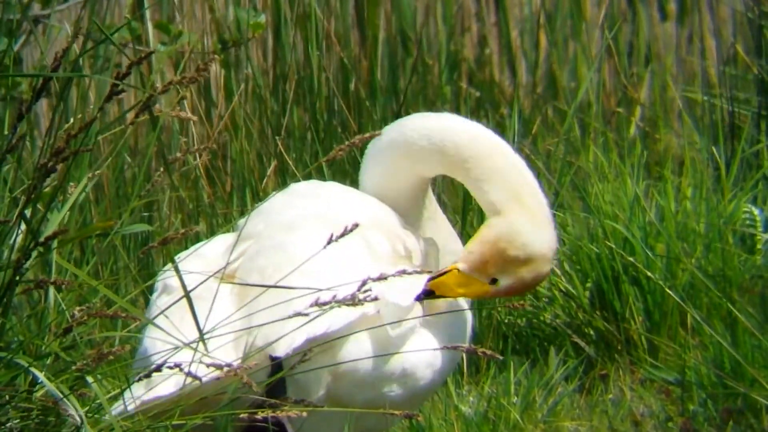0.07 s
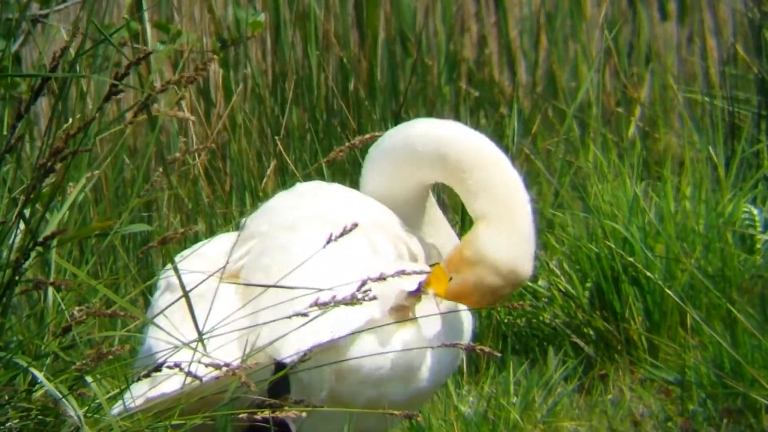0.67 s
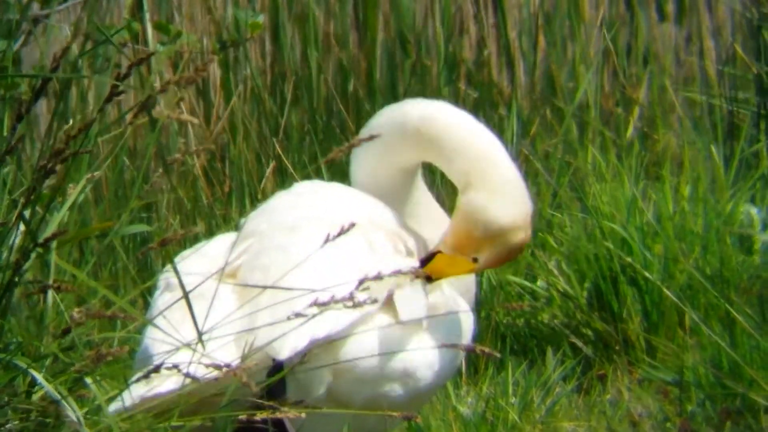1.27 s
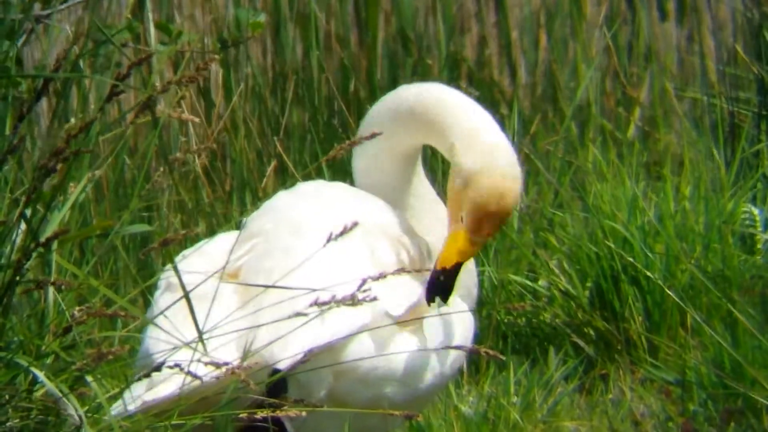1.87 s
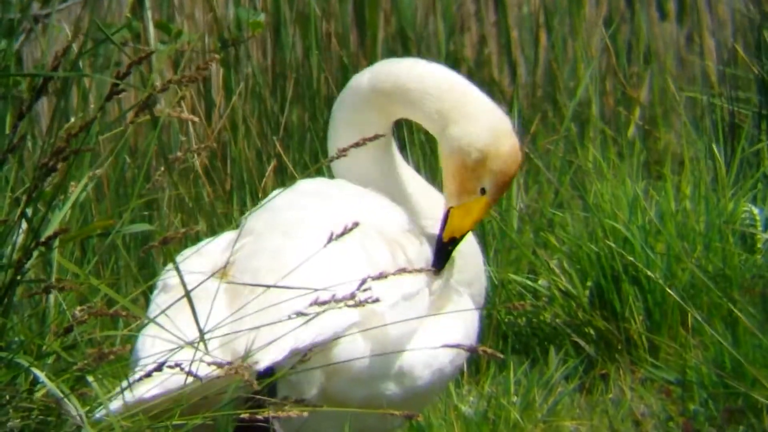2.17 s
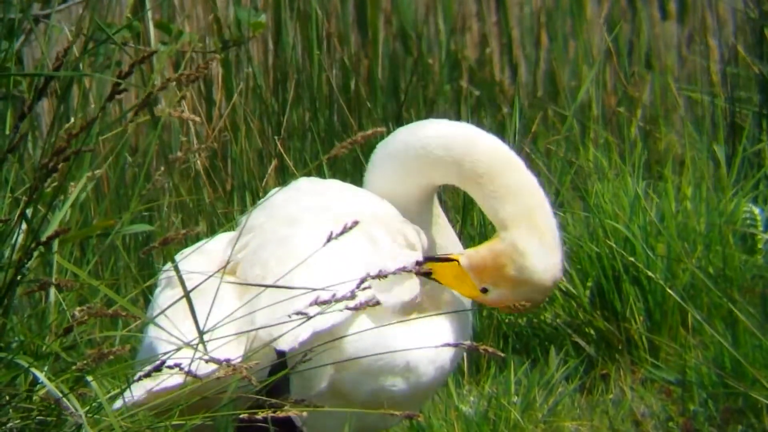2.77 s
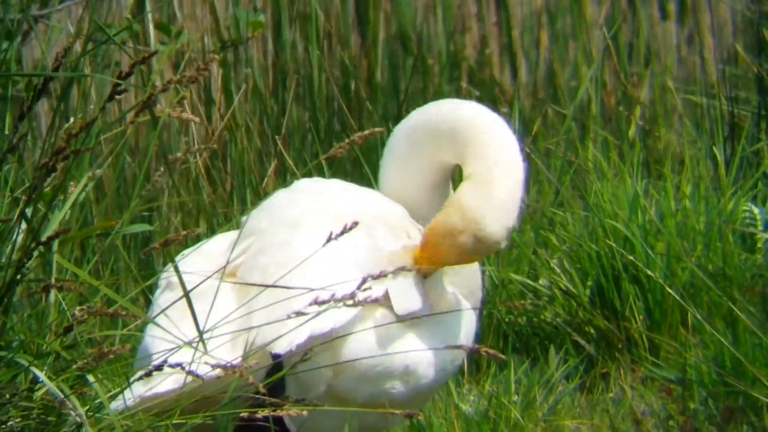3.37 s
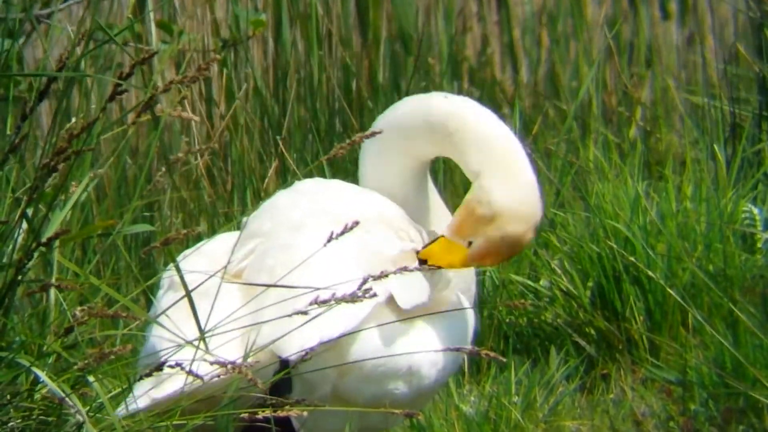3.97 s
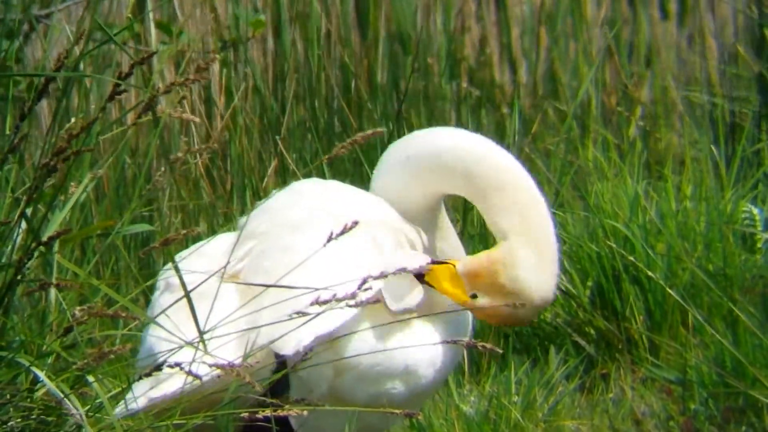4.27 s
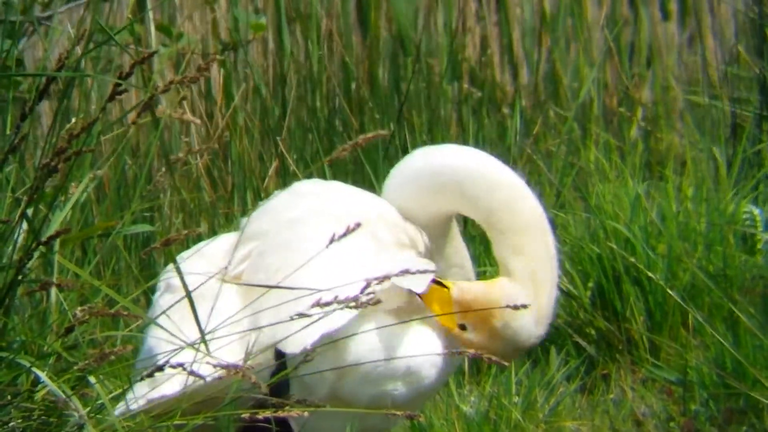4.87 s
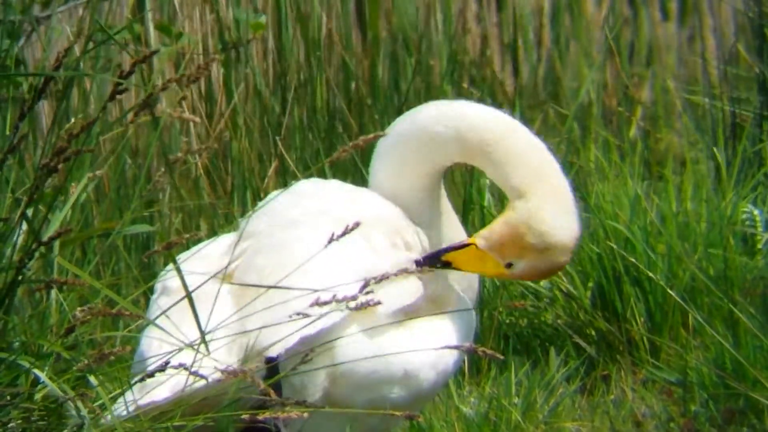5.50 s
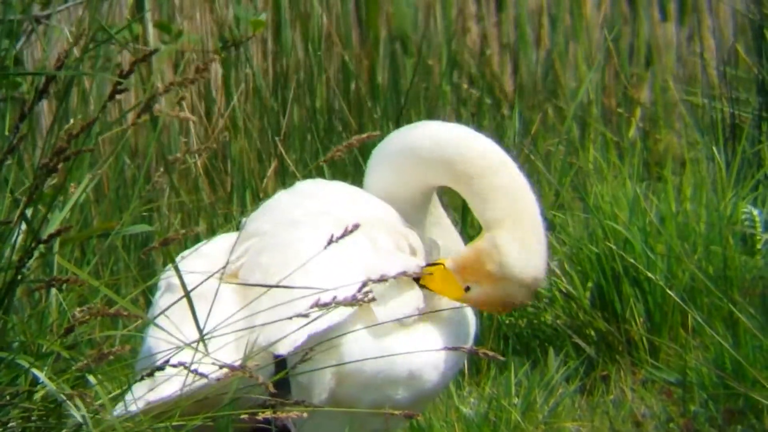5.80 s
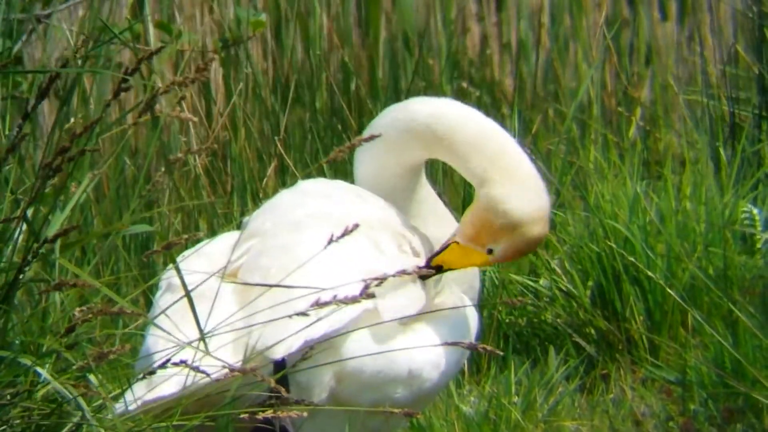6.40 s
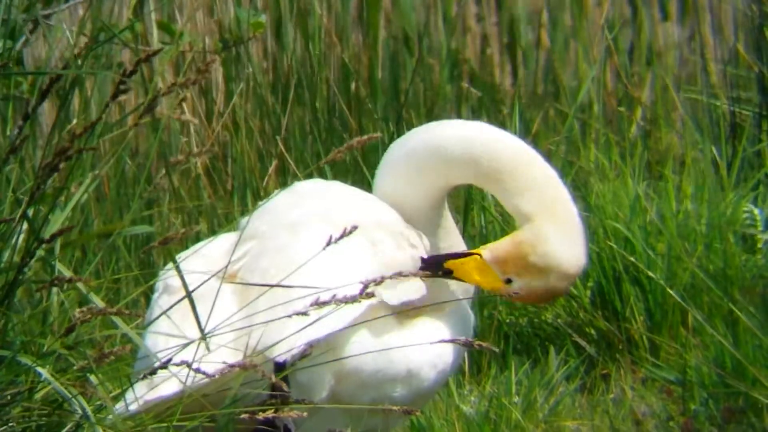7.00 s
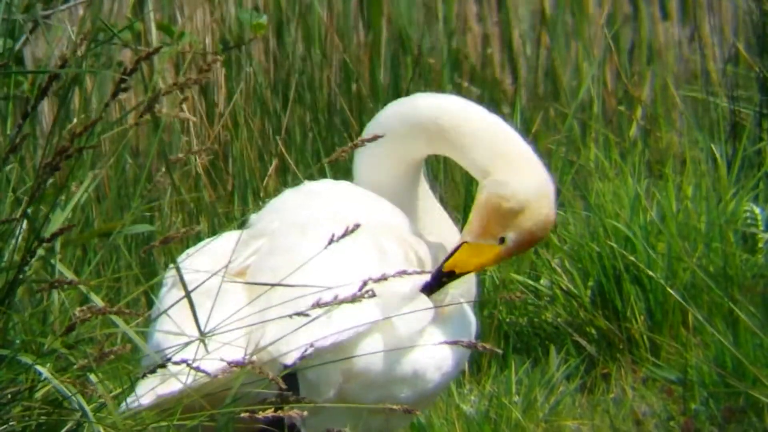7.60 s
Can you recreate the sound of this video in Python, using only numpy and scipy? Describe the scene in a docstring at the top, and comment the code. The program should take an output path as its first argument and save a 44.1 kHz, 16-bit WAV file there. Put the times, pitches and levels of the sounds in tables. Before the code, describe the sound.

Wind rustles and knocks dry reeds and bumps the microphone, with a swan's light preening clicks and small birds singing far off.

```python
"""Reeds hiss in a gusty breeze at the edge of a reed bed, with small birds whistling far off.
The gusts brush leaves together and knock stalks, and eddies buffet each microphone port in turn.
Near the microphone a swan preens: bill and quills click, and feathers swish through the bill.
Dry blades rub and snap, a distant waterfowl calls twice, and toward the end a warbler chatters
over the twitter of farther birds."""
import sys
import numpy as np
from scipy import signal
from scipy.fft import rfft, irfft
from scipy.io import wavfile
from scipy.ndimage import uniform_filter1d

SR = 44100
rng = np.random.default_rng(int(sys.argv[2]) if len(sys.argv) > 2 else 0)


def master_out(mix):
    """Clip the mix to full scale and print it as 16-bit PCM to the path in sys.argv[1]."""
    frames = np.transpose(np.atleast_2d(mix))
    ceiling = np.clip(frames, -1, 1)
    pcm = np.round(ceiling * 32767).astype(np.int16)
    wavfile.write(sys.argv[1], SR, pcm)


N = 337365


def amp(db):
    """Decibels to gain."""
    return 10 ** (np.asarray(db) / 20)


def unit(x):
    """Scales to an rms of 1."""
    return x / np.sqrt(np.mean(x ** 2) + 1e-20)


def drift(count, span):
    """A random wander of rms 1, smoothed over span steps."""
    return unit(uniform_filter1d(rng.standard_normal(count), size=span))


def read(spectrum, hz):
    """Reads a spectrum on a log-frequency axis."""
    freq_hz, value = np.transpose(spectrum)
    return np.interp(np.log(hz + 1), np.log(freq_hz + 1), value)


def follow(rows, lag_s=0):
    """Each column of a time curve at every sample, lag_s late."""
    times, *columns = np.transpose(rows)
    return [np.interp(np.arange(N) / SR - lag_s, times, column) for column in columns]


def add(mix, start_s, sound):
    """Mixes a sound in at start_s."""
    part = mix[..., max(round(start_s * SR), 0):][..., :sound.shape[-1]]
    part += sound[..., :part.shape[-1]]


def sides(pan_db):
    """Gains of the two microphone ports; pan_db is left minus right."""
    return amp(np.array([[.5], [-.5]]) * pan_db)


def colour(x, spectrum, stretch=1):
    """Filters by a spectrum whose frequencies are multiplied by stretch."""
    hz = np.fft.rfftfreq(x.shape[-1], 1 / SR)
    return irfft(rfft(x) * amp(read(spectrum, hz / stretch)), x.shape[-1])


def crackle(spectrum, per_s, spread_db):
    """Tiny contacts of unequal size, each stronger in one port."""
    size = amp(spread_db * np.minimum(rng.exponential(1, N), 3))
    contacts = rng.random(N) < per_s / SR
    return unit(colour(size * contacts * rng.uniform(-0.99, 1, (2, N)), spectrum))


# How alike the two ports hear the surrounding noise: freq_hz, coherence
PORT_COHERENCE = [(40, 0.46), (150, 0.86), (300, 0.95), (700, 0.62), (1300, 0.72), (2200, 0.1), (6000, 0),
                  (15000, 0.07)]
def wash(spectrum, patchy_db, flutter_db, lag_ms):
    """Noise with drifting patches and a shared flutter, reaching the right port a little late."""
    frames, hz = N // 256 + 5, np.fft.rfftfreq(1024, 1 / SR)
    a, b, c, d, patches = np.moveaxis(rng.standard_normal((frames, len(hz), 5)), -1, 0)
    patches = unit(uniform_filter1d(uniform_filter1d(patches, size=10, axis=0), size=20, axis=1))
    flutter = drift(frames, 7)[:, None]
    coherence = np.clip(read(PORT_COHERENCE, hz), 0, 1)
    left, unrelated = a + 1j * b, c + 1j * d
    right = coherence * left + np.sqrt(1 - coherence ** 2) * unrelated
    right *= np.exp(-2j * np.pi * hz * lag_ms / 1000)
    bins = np.array([left, right]) * amp(read(spectrum, hz) + patchy_db * patches + flutter_db * flutter)
    _, noise = signal.istft(bins.swapaxes(1, 2), nperseg=1024, noverlap=768)
    return unit(noise[:, :N])


# Gusts in the reed bed, heard as leaf hiss: time_s, level_db, pan_db
GUST_CURVE = [(.06, -55, -1), (.165, -60.5, -2), (.23, -55.5, 1), (.285, -50, 0), (.345, -46, 0),
              (.42, -48, 1.5), (.5, -46.5, 1.5), (.63, -51.5, 3), (.9, -52.5, .5), (.97, -57, 2),
              (1.06, -56, 2), (1.11, -58, 1), (1.22, -52, -0.5), (1.295, -49, -3.5), (1.38, -51.5, -1.5),
              (1.46, -53.5, 0), (1.6, -51.5, 1.5), (2.12, -51.5, 0.5), (2.39, -46.5, -2), (2.46, -50, 1.5),
              (2.85, -52, 1.5), (3.1, -59, 2.5), (3.551, -60, 2.5), (3.8, -55.5, 3.5), (4.28, -58, 2.5),
              (4.46, -63.5, 2.5), (6.88, -65, 1), (7.1, -62, -1.5), (7.53, -59, -1.5), (7.65, -63, 0)]
# Leaves brushing: freq_hz, gain_db
LEAF_SPECTRUM = [(710, -21), (1200, -7.5), (1600, -8.5), (1730, -6.5), (2480, -3), (2950, -2.5), (4530, -2),
                 (6110, 2), (7330, 1.5), (8790, -6.5), (10700, -11), (14700, -13), (15500, -17.5)]
def leaves():
    """Gusts brush the reed leaves together in a bright hiss full of small ticks."""
    gust_db, pan_db = follow(GUST_CURVE)
    hiss = amp(4.5) * wash(LEAF_SPECTRUM, patchy_db=1.5, flutter_db=.6, lag_ms=0.303)
    ticks = amp(-6.5) * crackle(LEAF_SPECTRUM, per_s=640, spread_db=0)
    return (hiss + ticks) * amp(gust_db) * sides(pan_db)


def driven(level_db, growth, lag_s=0, average_gust_db=-55):
    """A wind-driven level: level_db in an average gust, plus growth dB for each dB of gust."""
    gust_db, _ = follow(GUST_CURVE, lag_s)
    return level_db + growth * (gust_db - average_gust_db)


SWAY = dict(level_db=-61.5, growth=0.88, lag_s=0.042)
# Stalks rubbing: freq_hz, gain_db
STALK_SPECTRUM = [(40, -25), (120, 1), (200, 4), (400, 0.5), (650, 0), (1000, -2.5), (1500, -11.5),
                  (2600, -36), (5000, -61)]
def stalks():
    """Swaying stalks rub with a low rustle, just behind each gust."""
    rustle = amp(2) * wash(STALK_SPECTRUM, patchy_db=2.5, flutter_db=1.5, lag_ms=0.3)
    ticks = amp(-6) * crackle(STALK_SPECTRUM, per_s=200, spread_db=4.5)
    return (rustle + ticks) * amp(driven(**SWAY))


# Rasp of dry blades: freq_hz, gain_db
BLADE_SPECTRUM = [(300, -19), (700, -6.5), (1100, -4.5), (1700, -3.5), (2400, -15), (3500, -11),
                  (6000, -51)]
# Longer rubs among the reeds: start_s, length_s, level_db
BLADE_RUBS = [(1.123, 0.28, -59.5), (1.697, 0.5, -56), (2.476, 0.54, -65)]
def blades():
    """Dry blades scrape across each other with the gusts and in a few longer strokes."""
    power = amp(driven(level_db=-67, growth=1.3)) ** 2
    for start_s, length_s, level_db in BLADE_RUBS:
        add(power, start_s, amp(level_db) ** 2 * np.hanning(round(length_s * SR)))
    rasp = amp(1.5) * wash(BLADE_SPECTRUM, patchy_db=3.5, flutter_db=-2, lag_ms=0.35)
    ticks = amp(-5.5) * crackle(BLADE_SPECTRUM, per_s=130, spread_db=3)
    return (rasp + ticks) * np.sqrt(power)


# Background of the marsh: freq_hz, gain_db
HUSH_SPECTRUM = [(20, -10), (60, 8), (170, 3.5), (300, -12.5), (480, -3.5), (1000, -20), (1800, -15),
                 (2800, -9), (4800, -6.5), (5600, -41), (7300, -2.5), (10400, -25), (14500, -16.5),
                 (15500, -13.5)]
# Breeze at the microphone: freq_hz, gain_db
RUMBLE_SPECTRUM = [(15, -20), (35, -0.5), (70, 2), (150, 3.5), (220, -7), (350, -10), (800, -30),
                   (2000, -47)]
def open_air():
    """A steady hush, stronger on the right, and a low rumble that swells a little with the gusts."""
    hush = wash(HUSH_SPECTRUM, patchy_db=2.5, flutter_db=0.5, lag_ms=0.12)
    rumble = wash(RUMBLE_SPECTRUM, patchy_db=0.5, flutter_db=1.7, lag_ms=0.051)
    return amp(-67) * sides(-11) * hush + amp(driven(level_db=-61.5, growth=0.3)) * rumble


def from_afar(x, t60_s, wet_db):
    """Distance across the marsh: a direct path and a diffuse tail scattered by the vegetation."""
    t = np.arange(SR // 2) / SR
    tail = rng.standard_normal((2, len(t))) * amp(-60 * t / t60_s)
    tail /= np.linalg.norm(tail[0])
    scattered = signal.fftconvolve(x[None], tail, axes=1)[:, :N]
    return (x + amp(wet_db) * scattered) / np.hypot(1, amp(wet_db))


def note(hz, waver):
    """A softly started bird tone whose pitch and strength both waver."""
    wobble, shimmer = drift(len(hz), 200), drift(len(hz), 200)
    tone = np.sin(2 * np.pi * np.cumsum(hz * (1 + waver * wobble)) / SR)
    return unit(tone * np.exp(shimmer / 2) * signal.windows.tukey(len(hz), .3))


# Small birds far from the microphone: start_s, length_s, start_hz, end_hz, level_db
BIRD_WHISTLES = [(.08, .07, 2530, 2480, -67), (.53, .19, 3820, 3800, -59), (.93, .16, 5000, 5040, -63.5),
                 (1.135, .07, 1864, 1780, -65), (1.15, .2, 3820, 3830, -62.5), (1.55, .16, 5000, 4950, -63),
                 (1.77, .13, 3830, 3820, -64), (2.78, .12, 4340, 4960, -57.5),
                 (3.09, .22, 2810, 2780, -64.5), (3.329, .14, 4330, 4170, -62.5),
                 (3.32, .12, 3200, 2810, -68), (3.365, .05, 3750, 3580, -67),
                 (3.674, .022, 4090, 4020, -59.5), (3.705, .05, 3450, 3490, -64.5),
                 (3.775, .04, 3000, 2950, -65), (3.94, .04, 2720, 2930, -65.5),
                 (4.625, .09, 3280, 3330, -71), (4.68, .065, 3000, 2830, -74), (4.82, .03, 4000, 4020, -68),
                 (5.14, .032, 4330, 4300, -66), (5.178, .024, 3660, 2900, -66),
                 (5.257, .025, 3600, 3100, -67.5), (5.285, .035, 2980, 2850, -70),
                 (5.427, .075, 3290, 3380, -68.5), (5.745, .045, 4350, 4340, -68),
                 (5.92, .04, 3520, 3430, -67), (6.06, .06, 3020, 3000, -71), (6.383, .035, 5030, 5020, -64),
                 (7.365, .025, 2400, 2200, -68), (7.511, .023, 2130, 2330, -64.5),
                 (7.556, .026, 3350, 2750, -58.5)]
def whistles():
    """Thin whistles blurred by distance; long, high glides warble most."""
    out = np.zeros(N)
    for start_s, length_s, start_hz, end_hz, level_db in BIRD_WHISTLES:
        glide = min(abs(np.log(end_hz / start_hz)), .06)
        warble = .005 + 7 * length_s * glide * (start_hz / 4400) ** 2
        tone = note(np.geomspace(start_hz, end_hz, round(length_s * SR)), warble)
        fade = unit(np.linspace(1, .5, len(tone)))
        add(out, start_s, amp(level_db + 2) * tone * fade)
    return from_afar(out, t60_s=.42, wet_db=-1)


def taps(count=14, over_sway_db=16, low_hz=400, high_hz=800):
    """Rows of light knocks at random times, stronger as the stalks sway harder."""
    level_db = driven(**SWAY) + over_sway_db
    return [(when * N / SR, level_db[int(when * N)], low_hz + (high_hz - low_hz) * pitch)
            for when, pitch in rng.random((count, 2))]


# Loud knocks in the reed bed: start_s, level_db, pitch_hz
STALK_KNOCKS = [(0.381, -43, 500), (.398, -37, 401), (0.426, -33, 1220), (0.438, -37, 522),
                (.458, -39, 500), (.491, -37, 390), (.55, -38, 450), (.596, -35.5, 560), (.759, -40.5, 463),
                (1.488, -37.5, 425), (1.662, -37, 404), (1.807, -36.5, 1400), (1.938, -36, 1400),
                (1.9485, -33, 2000), (2.269, -34, 1100), (2.517, -34, 1100), (2.67, -39, 1000),
                (2.7442, -31, 1500), (3.02, -39.5, 600), (3.325, -44, 650), (5.621, -47, 900)]
def knocks(right_lag_s=0.00019, scuff_db=-7):
    """Stalks knock, ring for a couple of damped cycles and scuff as they slide apart."""
    out, t = np.zeros((2, N)), np.arange(1024) / SR
    for start_s, level_db, pitch_hz in STALK_KNOCKS + taps():
        cycles = pitch_hz * t
        ring = np.sin(2 * np.pi * cycles) * np.exp(-cycles)
        scuff = unit(colour(rng.standard_normal(len(t)), BLADE_SPECTRUM, stretch=pitch_hz / 1200))
        knock = amp(level_db - 2) * (ring + amp(scuff_db) * scuff * np.exp(-cycles / 4))
        add(out[0], start_s, knock)
        add(out[1], start_s + right_lag_s, knock)
    return out


# Turbulent pressure on a port: freq_hz, gain_db
BUFFET_SPECTRUM = [(15, -51), (40, -15), (80, 4.5), (130, 3.5), (180, -3.5), (260, -15), (400, -35),
                   (800, -114), (2000, -71)]
# Eddies right on the microphone: start_s, length_s, level_db, speed_ratio, port (0 left, 1 right)
PORT_EDDIES = [(0.808, 0.036, -40, 0.5, 0), (0.894, 0.029, -40, 0.61, 0), (1.249, 0.037, -48, 0.58, 0),
               (1.72, 0.0045, -36, 0.39, 1), (1.776, 0.012, -29.5, 0.86, 1), (1.811, 0.011, -29, 0.76, 1),
               (1.968, 0.01, -41, 0.56, 1), (2.174, 0.0042, -26, 1.05, 1), (2.241, 0.019, -33, 0.81, 1),
               (2.39, 0.0082, -31, 1, 0), (2.429, 0.011, -31, 0.91, 0), (2.473, 0.065, -38.5, 0.87, 0),
               (2.677, 0.07, -35, 0.73, 0), (2.793, 0.11, -34.5, 0.81, 0), (4.099, 0.018, -45, 0.7, 1),
               (4.131, 0.059, -46, 0.8, 0), (4.705, 0.016, -45, 0.46, 1), (4.785, 0.033, -55, 0.72, 1),
               (4.87, 0.004, -44, 0.66, 1), (5.48, 0.0049, -45.5, 0.67, 1), (5.525, 0.0092, -44, 0.58, 1),
               (6.871, 0.064, -45, 0.91, 0), (6.958, 0.035, -34.5, 1.08, 0), (6.999, 0.043, -32.5, 1.38, 0),
               (7.142, 0.059, -24, 1.15, 0), (7.238, 0.027, -25.5, 1.24, 0), (7.278, 0.2, -35.5, 1.02, 0),
               (7.494, 0.015, -31.5, 1.05, 0), (7.533, 0.0082, -30, 1.56, 0)]
def eddies(rise_s=0.0013, fall_s=0.011, wake_db=-14, wake_s=0.043, lumps_db=1):
    """Each eddy shakes one port in lumps, inside a weak, slow wake; faster air sounds higher."""
    out, t = np.zeros((2, N)), np.arange(-16384, 16384) / SR
    for start_s, length_s, level_db, speed_ratio, port in PORT_EDDIES:
        before, after = np.maximum(-t, 0), np.maximum(t - length_s, 0)
        push = np.exp(-before / rise_s - after / fall_s)
        wake = amp(wake_db) * np.exp(-(before + after) / wake_s)
        lumps = unit(amp(lumps_db * drift(len(t), 800)))
        swirl = signal.hilbert(colour(rng.standard_normal(len(t)), BUFFET_SPECTRUM, stretch=speed_ratio))
        even_swirl = swirl.real / np.sqrt(uniform_filter1d(abs(swirl) ** 2, size=700) / 2)
        add(out[round(port)], start_s + t[0], amp(level_db) * np.maximum(push, wake) * lumps * even_swirl)
    return out


# Feather barbs: freq_hz, gain_db
BARB_SPECTRUM = [(300, -24), (1200, -18), (2300, -8), (3500, -8), (5000, -0.5), (7000, 4), (8200, -1),
                 (10000, -10.5), (15000, -17.5)]
# The swan's bill and quills, near the microphone: start_s, level_db, pitch_hz, pan_db
BILL_CLICKS = [(1.8957, -39, 7400, -2), (1.948, -22.5, 6700, -3), (2.0343, -37, 6770, -.5),
               (2.047, -35.5, 8500, -14), (2.6665, -31, 7600, -2), (2.6674, -33, 5960, 2),
               (3.12, -44, 7000, -4), (3.2787, -42, 6850, 2), (3.671, -35.5, 6900, 9),
               (3.674, -43, 5500, 15), (3.742, -43, 6560, 6), (3.7725, -39, 7000, 5),
               (4.3445, -41, 7300, 5), (4.3525, -39, 6800, 4), (4.5548, -47, 9800, -3),
               (5.029, -40, 7300, 1)]
def clicks(edge_db=-15, edge_s=.0007, ring_rise_s=.00019, rattle_db=-15, rattle_s=0.0068):
    """Bill meets quill: a sharp edge, a few cycles of bright ring, then a brief rattle of barbs."""
    out, t = np.zeros((2, N)), np.arange(1024) / SR
    swell = t / ring_rise_s
    for start_s, level_db, pitch_hz, pan_db in BILL_CLICKS:
        edge = amp(edge_db) * rng.standard_normal(len(t)) * np.exp(-t / edge_s)
        ring = swell * np.exp(1 - swell) * np.sin(2 * np.pi * pitch_hz * t)
        rattle = unit(colour(rng.standard_normal((2, len(t))), BARB_SPECTRUM)) * np.exp(-t / rattle_s)
        add(out, start_s, amp(level_db + 0.5) * sides(pan_db) * (edge + ring + amp(rattle_db) * rattle))
    return out


# Splintering blades: freq_hz, gain_db
SPLINTER_SPECTRUM = [(150, -15), (500, 0), (1800, 0), (2700, -5), (7000, -3), (15000, -18)]
# Blades snapping on either side of the microphone: start_s, level_db, pitch_hz, pan_db
BLADE_SNAPS = [(1.9885, -29.5, 2300, 5), (2.2682, -31, 2600, 4), (2.413, -27, 2800, 0),
               (2.5085, -28, 5500, -10), (2.5185, -25.5, 3400, -6), (2.5237, -33, 6000, -10),
               (2.5305, -33, 3800, 0), (2.5865, -26.5, 3300, 3), (2.6663, -35, 3800, -3)]
def snaps(right_lag_s=0.00023, splinter_db=-14, splinter_s=.0035):
    """A dry blade gives way in a single swing, followed by a few splinters."""
    out, t = np.zeros((2, N)), np.arange(1024) / SR
    for start_s, level_db, pitch_hz, pan_db in BLADE_SNAPS:
        crack = np.sin(2 * np.pi * pitch_hz * t) * np.exp(1 / 3 - t * pitch_hz * 4 / 3)
        spikes = rng.standard_normal(len(t)) ** 3
        splinters = unit(colour(spikes, SPLINTER_SPECTRUM)) * np.exp(-t / splinter_s)
        left, right = amp(level_db) * sides(pan_db) * (crack + amp(splinter_db) * splinters)
        add(out[0], start_s, left)
        add(out[1], start_s + right_lag_s, right)
    return out


# The swan's preening strokes, close by: start_s, length_s, swell_fraction, level_db, pan_db
FEATHER_STROKES = [(3.095, 0.035, .55, -45.5, -3), (3.736, 0.046, .3, -44, 8),
                   (4.331, 0.056, 0.3, -42.5, 4), (4.988, 0.078, 0.55, -45.5, 3)]
def feathers(clump_db=1.5):
    """Barbs slip past the edge of the bill in clumps: a short, crisp zip that swells and fades."""
    barbs = crackle(BARB_SPECTRUM, per_s=24000, spread_db=.5)
    clumps = unit(amp(clump_db * drift(N, 90)))
    envelope = np.zeros((2, N))
    for start_s, length_s, swell_fraction, level_db, pan_db in FEATHER_STROKES:
        progress = np.linspace(0, 1, round(length_s * SR))
        stroke = np.interp(progress, [0, swell_fraction, 1], [0, 1, 0]) ** .8
        add(envelope, start_s, amp(level_db) * sides(pan_db) * stroke)
    return envelope * barbs * clumps


# Breath in the waterfowl's throat: freq_hz, gain_db
THROAT_SPECTRUM = [(200, 2), (400, 5), (650, 7), (900, 4), (1150, -9), (1500, -26), (3000, -40)]
# Calls from far across the marsh: start_s, length_s, start_hz, top_hz, level_db
WATERFOWL_CALLS = [(3.86, .15, 390, 590, -59.5), (4.938, .155, 300, 640, -57)]
def waterfowl(peak_fraction=.72, overtone_db=-13, rasp_db=-5):
    """A hoarse, breathy call that rises to a peak and breaks off downward, dull with distance."""
    out = np.zeros(N)
    for start_s, length_s, start_hz, top_hz, level_db in WATERFOWL_CALLS:
        progress = np.linspace(0, 1, round(length_s * SR))
        arch = np.sin(np.pi / 2 * np.interp(progress, [0, peak_fraction, 1], [0, 1, 1.55]))
        hz = start_hz + (top_hz - start_hz) * arch
        tone = note(hz, waver=.05) + amp(overtone_db) * note(2 * hz, waver=.09)
        breath = colour(rng.standard_normal(len(hz)), THROAT_SPECTRUM)
        rasp = unit(breath * signal.windows.tukey(len(hz), .5))
        add(out, start_s, amp(level_db) * (tone + amp(rasp_db) * rasp))
    return from_afar(out, t60_s=.8, wet_db=-4)


# Strength of the farther songbirds' notes: time_s, level_db
TWITTER_CURVE = [(4.6, -74), (6.2, -72), (6.9, -88), (7.35, -67), (7.53, -65)]
def twitter(count=100):
    """Short scratchy falling notes from farther birds, crowding together as their song builds."""
    out = np.zeros(N)
    times, levels_db = np.transpose(TWITTER_CURVE)
    for k, (late, pitch, glide, span) in enumerate(rng.random((count, 4))):
        start_s = times[0] + (times[-1] - times[0]) * ((k + late) / count) ** (1 / 3)
        length_s = .018 + .03 * span
        hz = (3100 + 1900 * pitch) * np.geomspace(1, .74 + .24 * glide, round(length_s * SR))
        add(out, start_s, amp(np.interp(start_s, times, levels_db)) * note(hz, waver=.03))
    return from_afar(out, t60_s=.3, wet_db=2)


# Buzz in the warbler's throat: freq_hz, gain_db
BUZZ_SPECTRUM = [(2400, -25), (3100, -12), (3600, -2), (4600, 3), (5000, 0), (5800, -15), (7000, -33)]
# Distant syllables, a little to the right: time_s, chip_count, spacing_s, top_hz, level_db
WARBLER_SYLLABLES = [(5.812, 4, 0.023, 4900, -58.5), (6.037, 2, 0.038, 4760, -58),
                     (6.19, 3, 0.013, 4700, -59.5), (6.266, 3, .013, 4870, -56.5),
                     (6.347, 3, .013, 4650, -58.5), (6.45, 3, 0.014, 4700, -59),
                     (6.531, 3, 0.011, 4560, -58.5), (6.647, 3, .013, 4710, -59),
                     (6.729, 3, 0.012, 4630, -54.5), (6.831, 3, .025, 4650, -57.5),
                     (6.958, 3, .025, 4700, -55.5), (7.084, 3, .024, 4770, -53.5),
                     (7.187, 4, 0.0245, 4600, -54.5), (7.33, 2, 0.012, 3950, -55.5),
                     (7.445, 3, 0.015, 4390, -55.5)]
def warbler(chip_s=.015, drop_fraction=.27, buzz_db=-3, uneven_db=1.2):
    """A warbler chatters in quick, buzzy chips whose pitch arches up and then drops."""
    out, count = np.zeros(N), round(chip_s * SR)
    arch = 1 - drop_fraction * np.linspace(-.6, 1, count) ** 2
    for time_s, chip_count, spacing_s, top_hz, level_db in WARBLER_SYLLABLES:
        for k in range(round(chip_count)):
            breath = colour(rng.standard_normal(count), BUZZ_SPECTRUM, stretch=top_hz / 4700)
            buzz = unit(breath * np.hanning(count))
            chip = unit(note(top_hz * arch, waver=.025) + amp(buzz_db) * buzz)
            chip_db = level_db - 1 + uneven_db * rng.standard_normal()
            add(out, time_s + k * spacing_s - chip_s / 2, amp(chip_db) * chip)
    return from_afar(out, t60_s=.2, wet_db=-4.5) * sides(-1.5)


def scene():
    """Reeds, wind, swan and far birds, heard from the edge of the reed bed."""
    bed = leaves() + stalks() + blades() + open_air()
    events = whistles() + knocks() + eddies() + clicks() + snaps() + feathers()
    return bed + events + waterfowl() + twitter() + warbler()


# Balance of the microphone's ports: freq_hz, pan_db
PORT_BALANCE = [(2500, -0.5), (4400, 0), (8000, -5.5), (15000, -2)]
def record(dry, cutoff_hz=15700):
    """A two-port microphone, a little brighter on the right, then the recorder's band limit."""
    pan_db = read(PORT_BALANCE, np.fft.rfftfreq(N, 1 / SR))
    heard = irfft(rfft(dry) * sides(pan_db), N)
    lowpass = signal.firwin(511, cutoff_hz, window=("kaiser", 9), fs=SR)
    return signal.oaconvolve(heard, lowpass[None], "same")


dry = scene()
out = record(dry)
master_out(out)
```